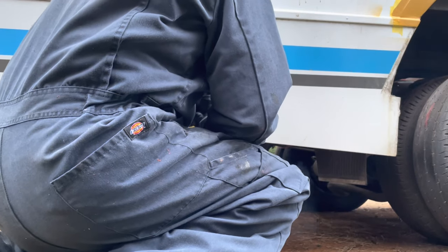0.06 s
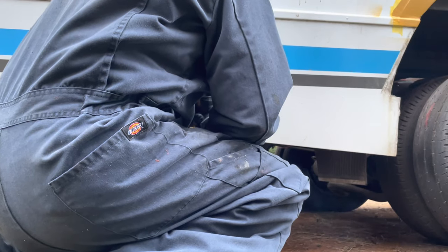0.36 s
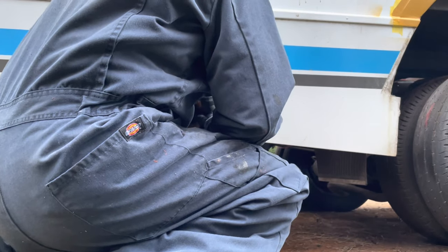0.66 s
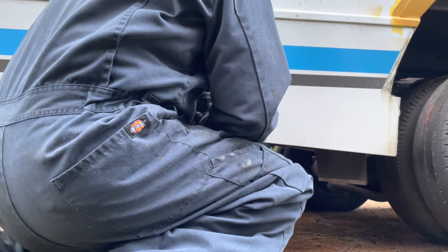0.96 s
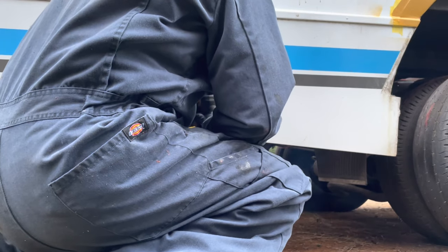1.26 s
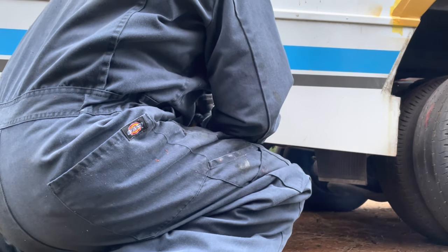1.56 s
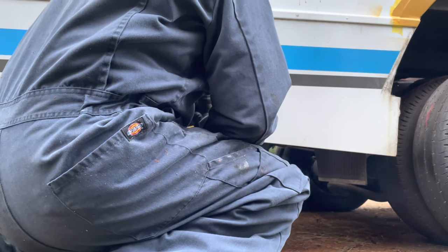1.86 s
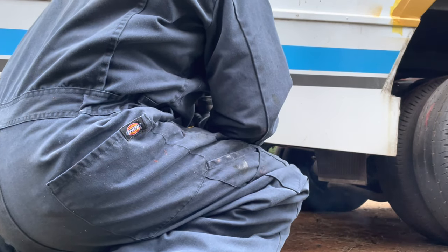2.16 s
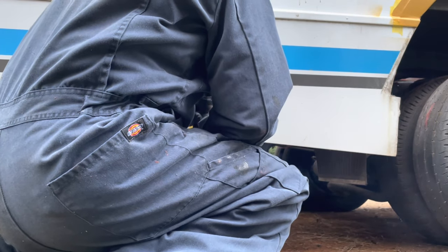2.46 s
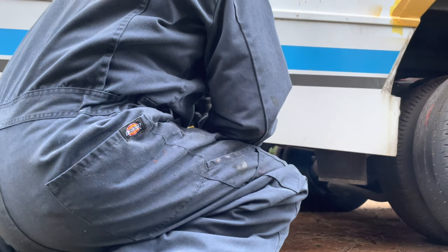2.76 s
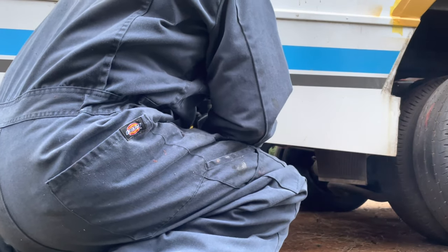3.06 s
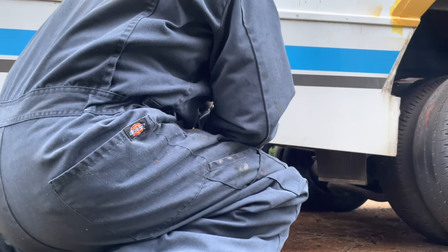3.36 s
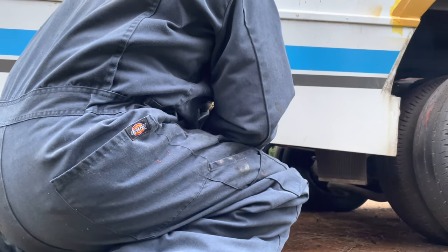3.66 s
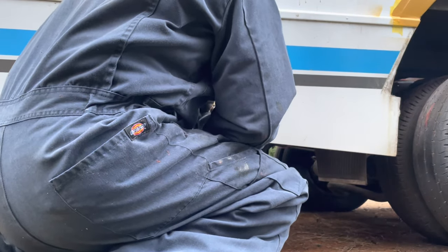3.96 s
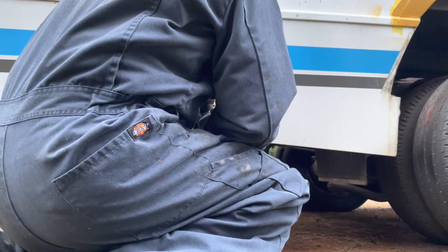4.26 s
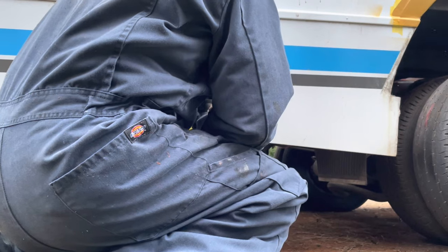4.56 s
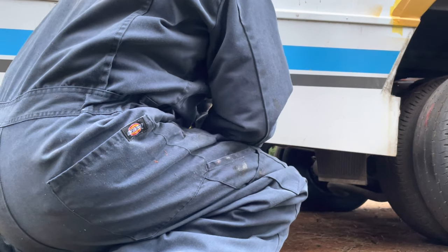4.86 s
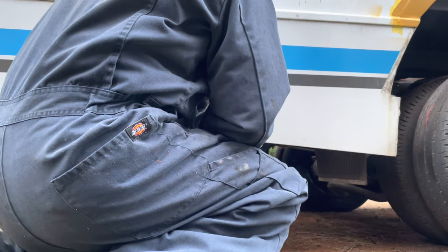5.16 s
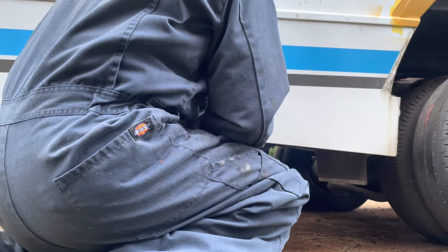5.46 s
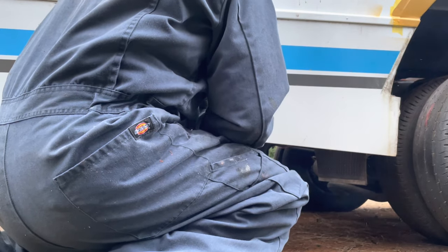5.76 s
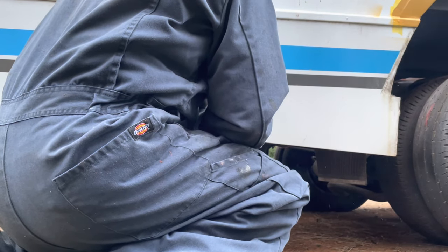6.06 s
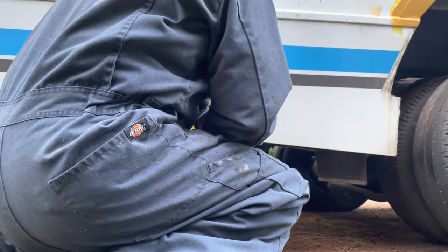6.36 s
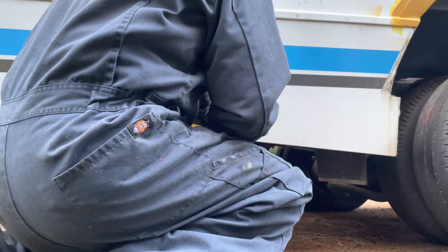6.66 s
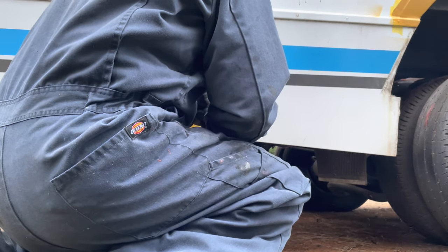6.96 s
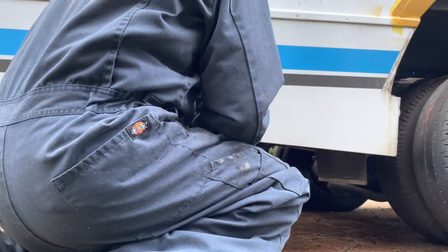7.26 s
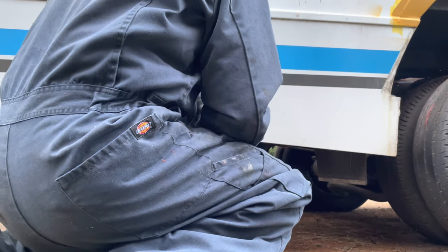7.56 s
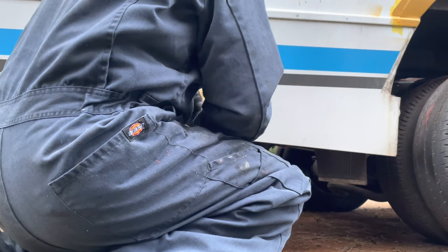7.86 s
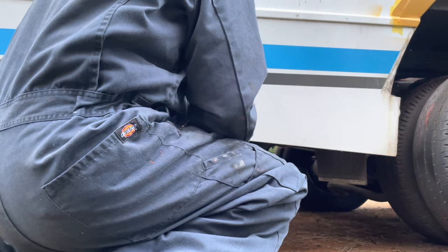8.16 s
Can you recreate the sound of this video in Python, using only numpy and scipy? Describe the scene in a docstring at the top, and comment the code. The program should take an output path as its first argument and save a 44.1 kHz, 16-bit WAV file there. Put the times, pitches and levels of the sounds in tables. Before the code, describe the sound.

Outdoors, a cordless drill pushes a hole saw into the steel side of a van. Four bursts of rough, chattering rasp sag in pitch as the teeth bite, and the body panel drums along. After a short pause, a longer, faster burst hammers and squeaks. The saw is then worked loose with faint rubs, ticks, knocks and short pings over a low rumble.

```python
"""A cordless drill pushes a hole saw through the steel side of a van, outdoors, over a low rumble.
0-3.7 s: four bursts. Teeth shake the panel at their passing rate, which sags as the saw bites;
chips tear off, the body drums, the saw knocks in its groove. 3.9 s: the motor drive whines faintly.
4.2-6.3 s: fifth burst; the teeth skate and hammer at top speed, the rim squeaks.
6.3-8.3 s: the saw is worked free with rubs, ticks, short whines, knocks and pings of its cup."""
import sys
import numpy as np
from scipy import signal
from scipy.fft import rfft, irfft, next_fast_len
from scipy.io import wavfile
from scipy.ndimage import uniform_filter1d

SR = 44100
rng = np.random.default_rng(int(sys.argv[2]) if len(sys.argv) > 2 else 0)


def wav_out(sig):
    """Save sig, one row per channel (or a flat mono array), as 16-bit PCM at SR to the path in sys.argv[1]."""
    wavfile.write(sys.argv[1], SR, np.round(np.clip(np.atleast_2d(sig).T, -1, 1) * 32767).astype(np.int16))


N = 366151

# Saw speed, one list per trigger pull. Each row: time in seconds, tooth rate in Hz.
BURSTS = [
    [(-.1, 194), (.02, 187.8), (.11, 156.7), (.17, 111.9), (.29, 110.9), (.43, 98.5), (.48, 79)],
    [(.74, 73.9), (.8, 169.2), (.88, 207.9), (1.08, 175.4), (1.14, 155.3), (1.19, 108.7), (1.29, 89.7),
     (1.37, 67.9)],
    [(1.513, 69.4), (1.68, 187.7), (1.79, 174.5), (1.95, 119.3), (2.03, 80.2), (2.11, 70.3), (2.18, 108.8),
     (2.25, 157.5), (2.39, 134.7), (2.53, 86.67), (2.61, 116.3), (2.67, 83.37), (2.82, 157), (2.89, 161.2),
     (2.96, 92.4), (3.04, 118), (3.16, 74.6)],
    [(3.315, 65.4), (3.44, 137), (3.51, 157), (3.59, 157), (3.68, 74.3)],
    [(4.158, 77.77), (4.21, 95.2), (4.31, 156.6), (4.42, 199.9), (4.55, 171.6), (4.66, 184.4),
     (4.73, 91.05), (4.8, 116.1), (4.89, 75.8), (4.96, 101.3), (5.03, 175.7), (5.13, 221.1), (5.52, 233.3),
     (5.64, 189.4), (5.75, 173.2), (5.82, 166.1), (5.93, 171.9), (6.13, 150.7), (6.19, 89.2), (6.255, 76.9)],
]
# Feed pressure. Each entry: gain of one pull in dB.
FEED_DB = [0.58, 0.32, -1.1, -0.74, -0.78]
# The saw loses grip. Each row: centre in seconds, half length in seconds, change in dB.
SLIPS = [(0.382, 0.02, -9.5), (0.773, 0.018, -0.5), (1.184, 0.021, -5.5), (2.116, .022, -0.5),
         (2.707, 0.0074, -3.5), (2.968, 0.019, -3), (3.11, 0.016, -17), (3.652, 0.03, -11),
         (4.708, 0.014, -6.5), (4.895, 0.085, -3.5), (5.211, 0.012, -5.5), (5.363, .012, -8.5),
         (5.443, 0.02, -7.5), (5.77, 0.022, -1.5), (6.167, 0.015, -8.5)]
# A tooth tears a thicker chip. Each row: time in seconds, extra chip force in dB.
SNAGS = [(0.045, 4), (.134, 1), (.175, 2), (.274, 3), (.323, 3), (0.403, 9.5), (0.428, 11.5), (0.829, 4),
         (.902, 3.5), (.99, 0), (1.127, 5), (1.226, 6.5), (1.249, -0.5), (1.29, 5), (1.631, 0.5), (1.76, 3),
         (1.837, 0), (1.862, -1), (1.937, 4), (2.166, 2.5), (2.227, 0.5), (2.344, 0), (2.426, 6.5),
         (2.576, 1), (2.65, 3), (2.725, 3.5), (2.812, 2.5), (2.9, 3.5), (3.0, 5), (3.04, 7), (3.398, 4),
         (3.588, 6), (4.228, 5), (4.282, 6), (4.305, 1.5), (4.39, 5), (4.565, 4.5), (4.663, 3.5),
         (4.778, 1), (4.815, 5.5), (4.985, 1), (5.022, 1), (5.076, 4), (5.162, 2), (5.252, 2), (5.319, 2),
         (5.39, 2), (5.473, 4), (5.55, 1.5), (5.608, 3), (5.802, 1), (5.903, 0.5)]
# Throb, strongest at the panel's low modes. Each row: tooth rate in Hz, level in dB.
THROB = [(80, -19.5), (108, -20.5), (128, -22), (156, -18), (178, -22), (200, -24), (230, -29.5)]
# Bay and sheet resonances met by tooth-rate overtones. Each row: frequency in Hz, gain in dB.
GROWL = [(200, -17.5), (265, -2.5), (310, -5.5), (360, -2.5), (410, -0.5), (460, -6.5), (520, -10.5),
         (690, -24), (850, -15.5), (1150, -16), (1480, -14), (1750, -19), (2100, -25), (2600, -26)]
# Sheet steel scraped by teeth. Each row: frequency in Hz, gain in dB.
STEEL = [(250, -16.5), (520, -4.5), (730, -5), (830, -2.5), (950, -2), (1500, -3.5), (1780, -6.5),
         (2050, -6), (2500, -10), (3600, -13), (5000, -18), (5700, -23), (7000, -20), (8500, -19),
         (11000, -24.5), (12600, -17.5), (15500, -38.5)]
# A blunt tooth blow relative to a tearing chip. Each row: frequency in Hz, gain in dB.
BLUNT = [(500, -1), (1100, 3), (1550, 5.5), (1900, -13), (5000, -9.5), (12600, -1.5)]
# Modes of the panel bay round the cut. Each row: frequency in Hz, width in Hz, gain in dB.
BAY_MODES = [(280, 52, 2), (340, 170, -1), (420, 17, 1.5), (450, 63, -14), (656, 39, -9.5)]
# Low modes of the van body. Each row: frequency in Hz, width in Hz, gain in dB.
BODY_MODES = [(77.7, 7.5, 4.5), (105, 15, 2.5), (157, 28, 3.5), (192, 150, -5)]
# Panel ring time. Each row: frequency in Hz, T60 in seconds.
PANEL_T60 = [(60, 1.2), (160, 0.78), (420, 0.49), (1100, 0.35), (2900, 0.32), (8000, 0.26)]
# Knocks in the groove. Each row: start in seconds, level in dB, relative thump in dB,
# relative treble in dB, contact time in seconds.
KNOCKS = [(.396, -20, 0, -25, 0.0053), (0.725, -29.5, 3, -16, 0.0025), (1.527, -60, -6, -23, .003),
          (2.144, -21, 1, -15, 0.0036), (3.124, -25, -0.5, -17, 0.0027), (3.206, -25.5, -1.5, -17, 0.0023),
          (3.372, -29, -3, -26, 0.0033), (3.664, -36, -6, -11, .003), (3.71, -37, 7.5, -10.5, 0.0066),
          (3.897, -43, 9.5, -14, 0.015), (4.167, -34, 1, -23, 0.012), (6.18, -42, 13, -17.5, 0.0049),
          (6.988, -56.5, 12, -23, 0.0044), (7.393, -41.5, -7, -31, 0.0011), (7.464, -27.5, -3, 0.5, 0.013),
          (7.631, -48, 1, -12, 0.0029), (7.713, -46, -1.5, -33, 0.0016), (7.816, -30, -10.5, -18, 0.0026),
          (8.005, -53.5, -15, -5, 0.0023), (8.16, -35, -36, -8.5, 0.00073)]
# The cup striking the hole's edge. Each row: frequency in Hz, gain in dB.
CLANK = [(60, -12.5), (250, -2), (600, 6), (900, 7), (1450, 6), (2200, -2), (3200, -3), (5000, -16.5),
         (7000, -24), (9000, -26), (12600, -40), (15500, -47)]
# Rim chirps in the groove. Each row: centre in seconds, level in dB.
SQUEAKS = [(4.87, -32), (5.08, -38.5), (5.168, -33), (5.25, -41), (5.32, -33), (5.4, -46), (5.478, -32),
           (6.196, -34)]
# Light slides in the hole. Each row: centre in seconds, half length in seconds, level in dB.
SLIDES = [(6.33, 0.05, -70), (6.562, 0.058, -74), (7.01, 0.053, -64.5), (7.3, .09, -76),
          (7.478, 0.039, -49), (7.756, 0.15, -73), (7.968, 0.073, -69), (8.27, 0.2, -70.5)]
# The cup rubbing in the hole. Each row: frequency in Hz, gain in dB.
RUB = [(100, -13), (300, -5), (700, -4), (1400, 8), (3000, -5), (4800, -7), (5700, -16), (9000, -17),
       (12600, -14), (15500, -32)]
# The cup rings as it comes free. Each row: start in seconds, level in dB, tilt in dB per octave.
PINGS = [(7.465, -34.5, 9), (7.63, -41, -28), (8.159, -39, 1.5)]
# Modes of the saw cup. Each row: frequency in Hz, gain in dB, T60 in seconds.
CUP_MODES = [(1405, -3, 0.031), (1610, -7, 0.057), (1980, -16, 0.08), (2700, -10, 0.091),
             (3320, -9.5, 0.055), (4610, -21, 0.1)]
# The loose saw shifts among swarf. Each row: start in seconds, level in dB, pitch in Hz.
TICKS = [(6.332, -54, 1700), (6.495, -70, 4960), (6.598, -56, 13800), (6.989, -67, 4510),
         (7.044, -65, 4800), (7.867, -50, 3500), (7.927, -57, 3000), (7.979, -57, 6060)]
# The drive pulses a barely turning motor. Each row: start in seconds, length in seconds,
# switching rate in Hz, level in dB.
WHINES = [(3.92, 0.13, 493, -61.5), (6.902, 0.025, 3930, -68.5), (7.415, 0.025, 3950, -78),
          (7.644, 0.021, 3930, -65)]
# Motor housing response. Each row: frequency in Hz, gain in dB.
HOUSING = [(490, 18), (2500, 7.5), (3200, 2), (3950, 2), (5000, -9.5), (7500, 8), (9500, 1), (11300, 4),
           (12300, 9), (13700, 11), (15000, -5)]
# Outdoor rumble spectrum. Each row: frequency in Hz, relative density in dB.
RUMBLE = [(15, -34), (25, -42), (54, -9), (118, -8.5), (150, -17), (213, -21), (354, -29.5), (621, -39),
          (879, -35.5), (1030, -41), (2400, -54.5), (3500, -60), (7000, -73), (15000, -80.5)]
# Stereo width; antiphase near 8.5 kHz. Each row: frequency in Hz, side minus mid in dB.
WIDTH = [(60, -23), (130, -17.5), (250, -8.5), (480, -6), (700, 1), (1000, -4), (1450, -9), (2000, -3.5),
         (4500, -3), (6500, -3.5), (8500, 17.5), (10500, -2), (12600, -4), (14000, -36.5)]

STALL_HZ, SKATE_HZ = 97.2, 189  # tooth rates: the cut fades below the first, skates above the second
TOP_HZ = 15700


def saw():
    """Cutting forces: tooth-rate tones, torn chips, hammering teeth, shoves on bay and body."""
    hz = curve(np.vstack(BURSTS))[0]
    skate = np.clip(0.014 * (hz - SKATE_HZ), 0, 1)
    # The saw snatches: speed wanders, teeth come early or late.
    wander = (0.017 + 0.02 * skate) * walk(45)
    teeth = np.cumsum(hz * (1 + wander)) / SR + 0.012 * walk(220)
    tones = throb(hz, teeth, skate) + growl(hz, teeth)
    chatter = 1 + 0.3 * np.cos(np.pi * teeth)  # alternate teeth dig deeper
    speed_db = np.log2(hz / STALL_HZ)
    chips = tearing(teeth, grit_db=1.4, surge_db=0.9, bite=0.18) * chatter
    chips *= np.sqrt(1 - 0.89 * skate) * amp(-31.5 + speed_db)
    hammer = strikes(teeth) * np.sqrt(skate + 0.55) * amp(-34.5)  # biting teeth strike too
    drum = tearing(teeth, grit_db=1, surge_db=1, bite=0.68) * (1 - 0.13 * skate) * amp(-28)
    boom = tearing(teeth, grit_db=2.5, surge_db=4.5, bite=0.33) * (1 - 0.86 * skate) * amp(-24.5)
    # The heavy panel follows a snag less than the rasp does.
    snag_db = snags_db()
    grab = amp(snag_db) * catches(teeth)
    forces = [tones * amp(0.34 * snag_db), chips * grab, hammer * grab,
              drum * amp(1.1 * snag_db), boom * amp(0.14 * snag_db)]
    return bite_depth(hz) * np.array(forces)


def bite_depth(hz, touch_s=0.019, attack_s=0.19, release_s=0.093, stall_db_per_hz=0.39):
    """Teeth touch, then bite as deep as the feed sets; depth is lost near a stall or in a slip."""
    t, pulls = clock(), np.zeros(N)
    for burst, feed_db in zip(BURSTS, FEED_DB):
        start_s, end_s = burst[0][0], burst[-1][0]
        touch = np.clip((t - start_s) / touch_s, 0, 1)
        attack = np.clip(0.45 + (t - start_s) / attack_s, 0, 1)
        release = np.clip((end_s - t) / release_s, 0, 1)
        pulls += amp(feed_db) * touch * attack * release
    stall_db = stall_db_per_hz * np.maximum(STALL_HZ - hz, 0)
    slip_db = sum(db * swell(s, half_s) for s, half_s, db in SLIPS)
    return pulls * amp(slip_db - stall_db)


def throb(hz, teeth, skate, spin_up_loss_db=4, full_spin_up_hz_per_s=570):
    """Teeth shake the panel at their rate; high and low teeth rock it at about half that."""
    tone = 0
    for ratio, db in [(1, 0.014), (0.46, -26.5)]:
        partial = np.sin(ratio * 2 * np.pi * teeth + 0.22 * walk(80))
        flutter_db = (3.4 + 5 * skate) * np.tanh(walk(45)) + 1.7 * walk(200)
        tone += partial * amp(db + flutter_db)
    spin_up = uniform_filter1d(np.clip(np.gradient(hz) * SR / full_spin_up_hz_per_s, 0, 1), size=2000)
    return unit(tone) * amp(across(THROB, hz) - spin_up_loss_db * spin_up)


def growl(hz, teeth, count=12, gain_db=-28):
    """Rough tooth-rate overtones, loudest as they cross a resonance; the high ones need speed."""
    out, speed = np.zeros(N), hz / SKATE_HZ
    for k in range(2, count + 1):
        rough_db = 4 * np.tanh(walk(25)) + 1.5 * walk(160)
        jitter_rad = (0.2 + 0.055 * k) * speed * walk(90)
        gain = amp(gain_db + rough_db + across(GROWL, k * hz)) * np.minimum(speed, 1) ** (k / count)
        out += gain * np.sin(k * 2 * np.pi * teeth + jitter_rad)
    return out


def tearing(teeth, grit_db, surge_db, bite):
    """Chips crack off in dense uneven grains, harder as each tooth enters."""
    grains = rng.standard_normal(N) * amp(grit_db * walk(900) + surge_db * walk(60))
    return unit(grains * (1 + bite * np.cos(2 * np.pi * teeth)))


def strikes(teeth, scatter_db=1.3, alternate_db=1):
    """One click per tooth; teeth are set alternately high and low."""
    at = np.flatnonzero(np.diff(np.floor(teeth)))
    size = amp(scatter_db * rng.standard_normal(N)[:len(at)] + alternate_db * (np.arange(len(at)) % 2))
    return unit(np.bincount(at, size, N))


def snags_db(rise_s=0.0089, fall_s=0.012):
    """Extra force as a tooth snags: jumps up, dies away."""
    t, out = clock(), np.zeros(N)
    for s, db in SNAGS:
        near = slice(max(int(s * SR) - SR // 10, 0), int(s * SR) + SR // 10)
        since_s = t[near] - s
        out[near] += db * np.exp(-(since_s / np.where(since_s < 0, rise_s, fall_s)) ** 2)
    return out


def catches(teeth, mean_gap_teeth=5, mean_jump_db=4, fall_s=0.004):
    """Every few teeth one catches: its force jumps and lets go at once."""
    at = np.flatnonzero(np.diff(np.floor(teeth)))
    gap, size = rng.uniform(0.5, 1.5, (len(at), 2)).T
    caught = np.cumsum(np.round(mean_gap_teeth * gap)).astype(int)
    caught = caught[caught < len(at)]
    jumps = np.bincount(at[caught], size[:len(caught)], N)
    decays = signal.lfilter([1], [1, -np.exp(-1 / (fall_s * SR))], jumps)
    return unit(amp(mean_jump_db * decays))


def panel(force, gain, early_s, tail_db, spots=1):
    """Dense plate, mid and side: a quick flash and a long ring, differing in detail at each spot."""
    t, hz = np.arange(SR) / SR, bins(SR)
    edges_hz = [0, 120, 300, 700, 1800, 5000, SR]
    spot = rng.integers(0, spots, N)
    noise = rfft(rng.standard_normal((spots, 2, SR)))
    responses = 0
    for lo, hi in zip(edges_hz, edges_hz[1:]):
        t60_s = across(PANEL_T60, np.sqrt((lo + 20) * hi))
        fade = np.exp(-t / early_s) + amp(tail_db) * np.exp(-np.log(1000) * t / t60_s)
        band = irfft(noise * ((hz >= lo) & (hz < hi)), SR)
        responses += band * fade / np.linalg.norm(fade)
    size, spectrum = next_fast_len(N + SR, True), 0
    for k, pair in enumerate(responses):
        # Divide out broad ripple: same colour at every spot.
        ripple = np.sqrt(uniform_filter1d(np.abs(rfft(pair)) ** 2, size=220))
        rings = [colour(r, unit(gain) / np.interp(bins(), hz, p)) for r, p in zip(pair, ripple)]
        spectrum += rfft(force * (spot == k), size) * rfft(rings, size)
    return irfft(spectrum, size)[:, :N]


def knocks(thump_s=0.027, tick_s=0.0078, bay_db=-4.5):
    """Each knock: a brief grating contact, a slower shove on body and bay, a bright tick."""
    grate, thump, tick = np.zeros((3, N))
    for s, db, thump_db, treble_db, contact_s in KNOCKS:
        t = clock()[:N - int(s * SR)][:SR // 2]
        contact, shove = rng.standard_normal((2, SR // 2))[:, :len(t)]
        at = slice(int(s * SR), int(s * SR) + len(t))
        grate[at] += amp(db) * contact * np.exp(-t / max(contact_s, 1e-3))
        thump[at] += amp(db + thump_db) * shove * np.exp(-t / thump_s)
        tick[at] += amp(db + treble_db) * shove * np.exp(-t / tick_s)
    return grate, thump, amp(bay_db) * thump, tick


def squeaks(pitch_hz=2290, half_s=0.0083):
    """Stick-slip of the rim: short wavering tones."""
    hz = pitch_hz * (1 + 0.05 * walk(400))
    tone = np.sin(2 * np.pi * np.cumsum(hz) / SR)
    return tone * sum(amp(db) * swell(s, half_s) for s, db in SQUEAKS)


def pings():
    """The cup rings in short-lived modes."""
    out, t = np.zeros(N), np.arange(SR // 8) / SR
    for s, db, tilt_db in PINGS:
        ring, at = 0, int(s * SR)
        for hz, mode_db, t60_s in CUP_MODES:
            gain = amp(db + mode_db + tilt_db * np.log2(hz / CUP_MODES[0][0]))
            ring += gain * np.sin(2 * np.pi * hz * t) * np.exp(-np.log(1000) * t / t60_s)
        out[at:at + len(t)] += ring[:N - at]
    return out


def slides():
    """The cup rubs the hole's edge in small sticking, scratching steps."""
    grain = amp(4.5 * np.tanh(walk(35)) + 4 * walk(300))
    envelope = sum(amp(db) * swell(s, half_s) for s, half_s, db in SLIDES)
    return envelope * unit(rng.standard_normal(N) * grain)


def ticks(fall_s=0.0015):
    """The saw shifts in the swarf: tiny noise bursts, each round its own pitch."""
    out, t = np.zeros(N), np.arange(SR // 20) / SR
    for s, db, hz in TICKS:
        gain = resonances([(hz, 0.35 * hz, 0)], low_hz=hz / 2, top_hz=TOP_HZ)
        burst = unit(colour(rng.standard_normal(len(t)), gain))
        out[int(s * SR):int(s * SR) + len(t)] += amp(db) * burst * np.exp(-t / fall_s)
    return out


def drive_whine(rise_s=0.004, ring_s=0.03, tilt_db_per_octave=-3, waver_db=2):
    """Current pulses make the windings sing through the housing, which rings on briefly."""
    out, t = np.zeros(N), np.arange(SR // 3) / SR
    for s, length_s, hz, db in WHINES:
        k = np.arange(1, TOP_HZ // hz + 1)[:, None]
        gain = amp(tilt_db_per_octave * np.log2(k) + across(HOUSING, k * hz))
        tone = unit((gain * np.cos(2 * np.pi * k * hz * t)).sum(0))
        envelope = np.clip(t / rise_s, 0, 1) * np.exp(-np.maximum(t - length_s, 0) / ring_s)
        waver = amp(waver_db * walk(70)[:len(t)])
        out[int(s * SR):int(s * SR) + len(t)] += amp(db) * tone * envelope * waver
    return out


def outdoors(level_db=-51, swell_db=2.5):
    """Low unsteady rumble, mid and side."""
    gain = unit(amp(across(RUMBLE, bins())))
    envelope = amp(level_db + swell_db * walk(12))
    return envelope * np.array([colour(rng.standard_normal(N), gain) for _ in range(2)])


def stereo(mid, side):
    """Left and right from mid and side, width set per frequency."""
    ratio = amp(across(WIDTH, bins()))
    mid = colour(mid, 1 / np.hypot(1, ratio))
    side = colour(side, ratio / np.hypot(1, ratio))
    return np.array([mid + side, mid - side])


def resonances(modes, low_hz, top_hz):
    """Gain of broad modes that radiate little outside their range."""
    hz = bins() + 1
    power = sum(amp(db) ** 2 / (1 + ((hz / f - f / hz) * f / width) ** 2) for f, width, db in modes)
    return np.sqrt(power / (1 + (low_hz / hz) ** 6) / (1 + (hz / top_hz) ** 8))


def colour(x, gain):
    """Minimum-phase filter with the given gain on bins()."""
    cepstrum = irfft(np.log(gain + 1e-6))
    half = len(cepstrum) // 2
    cepstrum[1:half] *= 2
    cepstrum[half + 1:] = 0
    return signal.fftconvolve(x, irfft(np.exp(rfft(cepstrum))))[:len(x)]


def bins(size=8192):
    """Filter frequency grid in Hz."""
    return np.fft.rfftfreq(size, 1 / SR)


def across(points, hz):
    """Interpolate (Hz, value) points over log frequency."""
    f, value = np.transpose(points)
    return np.interp(np.log(hz + 1), np.log(f), value)


def curve(rows):
    """Interpolate each value column over time."""
    s, *columns = np.transpose(rows)
    return [np.interp(clock(), s, c) for c in columns]


def walk(rate_hz):
    """Smooth random signal, rms 1."""
    k = max(int(SR / rate_hz), 1)
    return unit(uniform_filter1d(rng.standard_normal(N)[np.arange(N) // k], k))


def swell(centre_s, half_s):
    """Gaussian rise and fall."""
    return np.exp(-((clock() - centre_s) / half_s) ** 2)


def clock():
    """Sample times in seconds."""
    return np.arange(N) / SR


def amp(db):
    """Decibels to gain."""
    return 10 ** (np.asarray(db) / 20)


def unit(x):
    """Scale to rms 1."""
    return x / np.sqrt(np.mean(x ** 2))


def scene():
    """All forces act on one steel panel and the body behind it."""
    tooth_tones, chips, hammer, drum, boom = saw()
    grate, thump, clunk, tick = knocks()
    hz = bins()
    steel, clank, flat = amp(across(STEEL, hz)), amp(across(CLANK, hz)), np.ones(len(hz))
    bay = resonances(BAY_MODES, low_hz=184, top_hz=700)
    body = resonances(BODY_MODES, low_hz=71, top_hz=320)
    sound = panel(chips, steel, early_s=0.0049, tail_db=-12, spots=4)
    sound += panel(hammer, steel * amp(across(BLUNT, hz)), early_s=0.0032, tail_db=-20)
    sound += panel(grate, clank, early_s=0.005, tail_db=-13, spots=2)
    sound += panel(tick, clank * hz ** 2, early_s=0.0012, tail_db=-15.5)
    sound += panel(drum + clunk, bay, early_s=0.0044, tail_db=-14.5, spots=5)
    sound += panel(boom + thump, body, early_s=0.019, tail_db=-2, spots=5)
    sound += panel(slides(), amp(across(RUB, hz)), early_s=0.0033, tail_db=-33)
    sound += panel(ticks(), flat, early_s=0.0011, tail_db=-16)
    sound += outdoors()
    # Tones arrive directly, in the mid, and leave a weak ring in the panel.
    tones = tooth_tones + squeaks() + pings() + drive_whine()
    sound += amp(-13) * panel(tones, flat, early_s=0.01, tail_db=-10)
    sound[0] += tones
    return stereo(*sound)


def record(dry):
    """Phone: left port slightly louder above the bass; peaks rounded, deep bass thinned, top cut."""
    shaded = signal.sosfilt(signal.butter(1, [250, 7000], "band", fs=SR, output="sos"), dry)
    x = dry + 0.088 * np.array([[1], [-1]]) * shaded
    x = 0.65 * np.tanh(x / 0.65)
    x = signal.sosfilt(signal.butter(4, 47, "high", fs=SR, output="sos"), x)
    return signal.sosfilt(signal.ellip(8, 0.2, 70, TOP_HZ, fs=SR, output="sos"), x)


dry = scene()
out = record(dry)
wav_out(out)
```